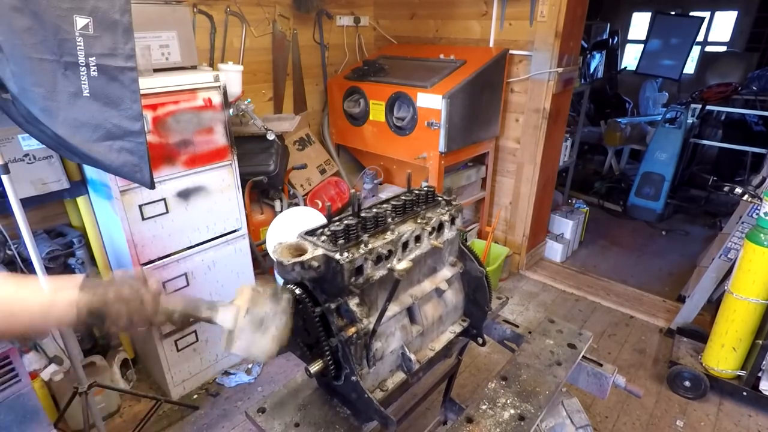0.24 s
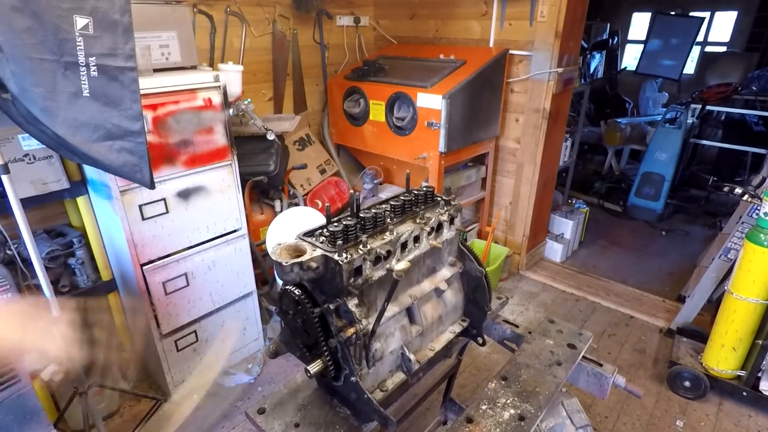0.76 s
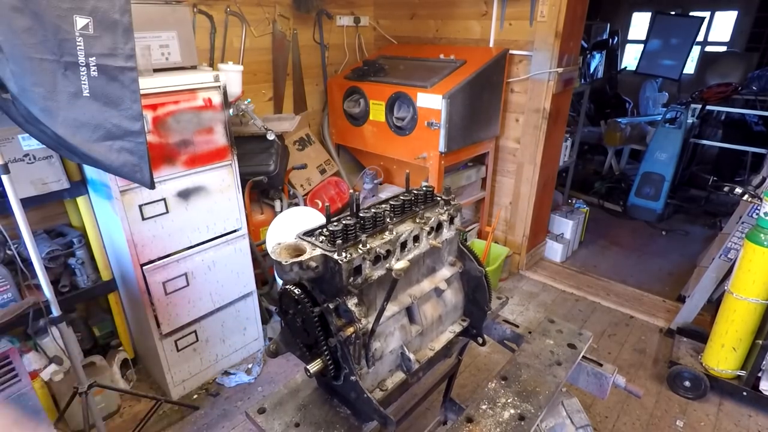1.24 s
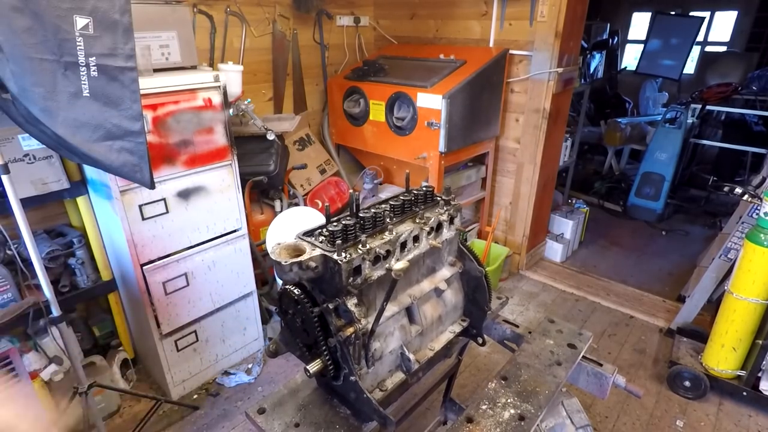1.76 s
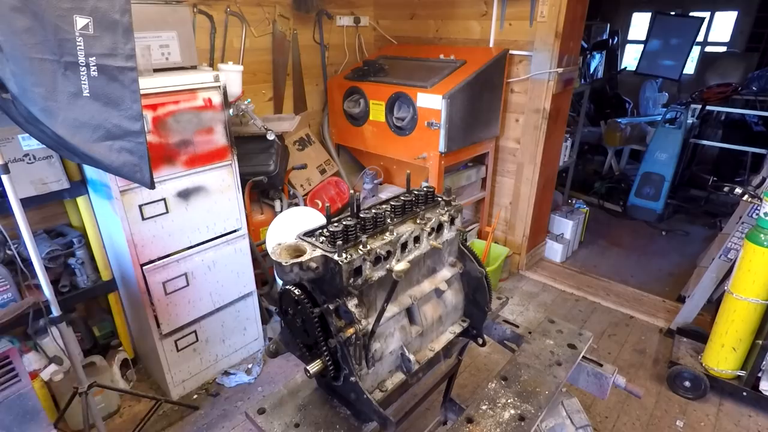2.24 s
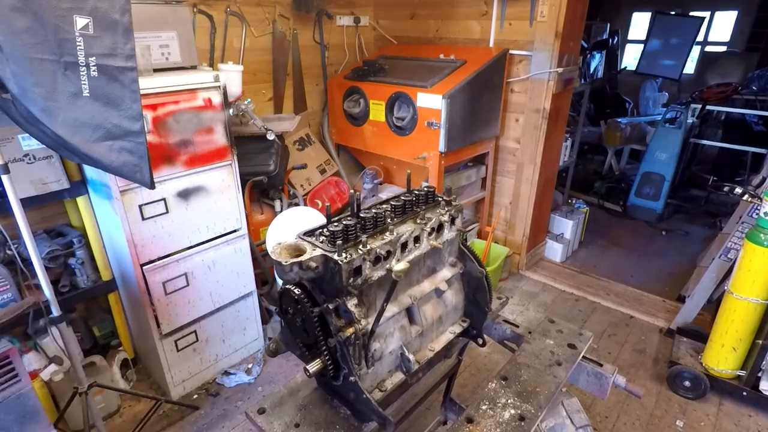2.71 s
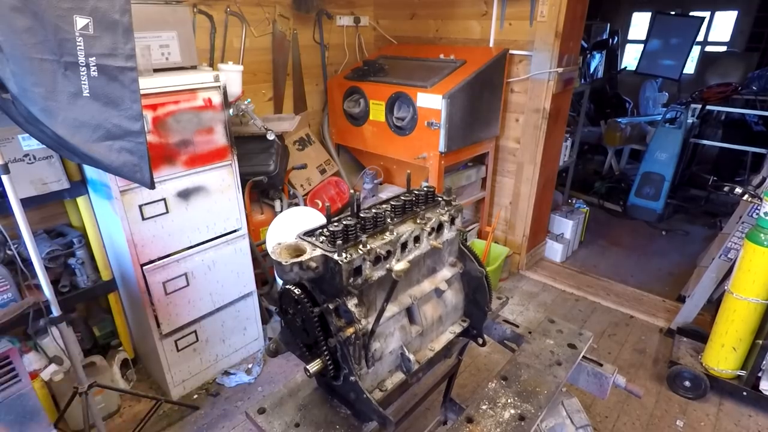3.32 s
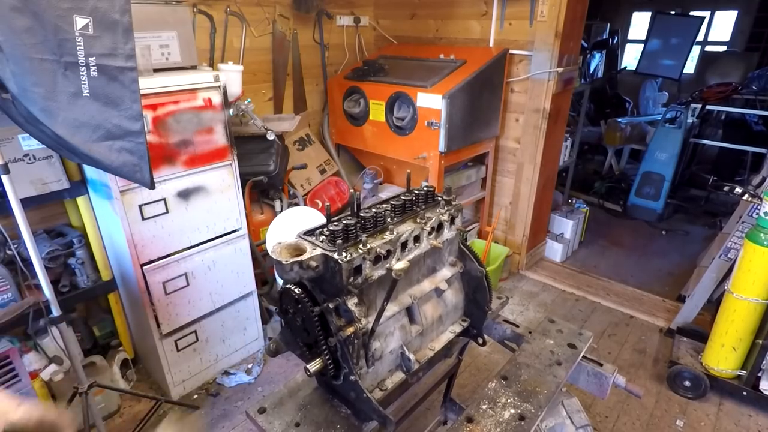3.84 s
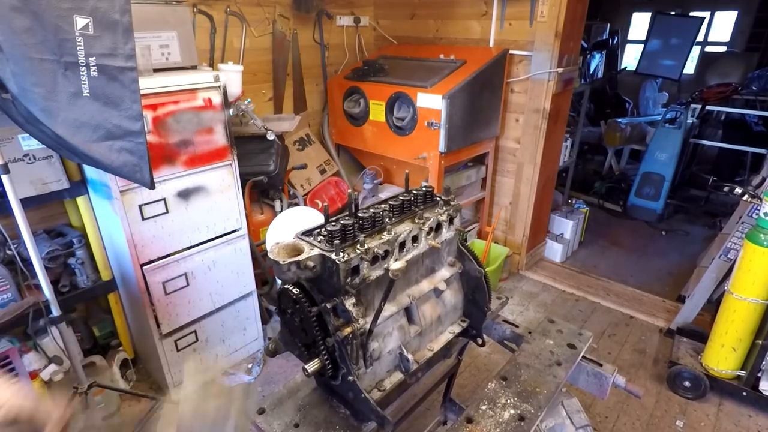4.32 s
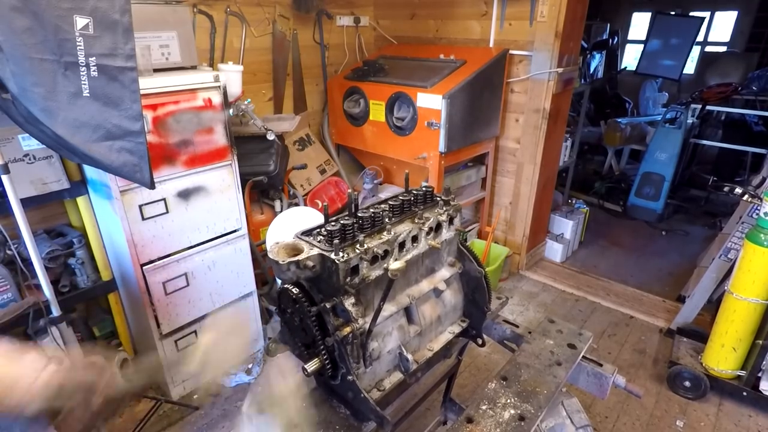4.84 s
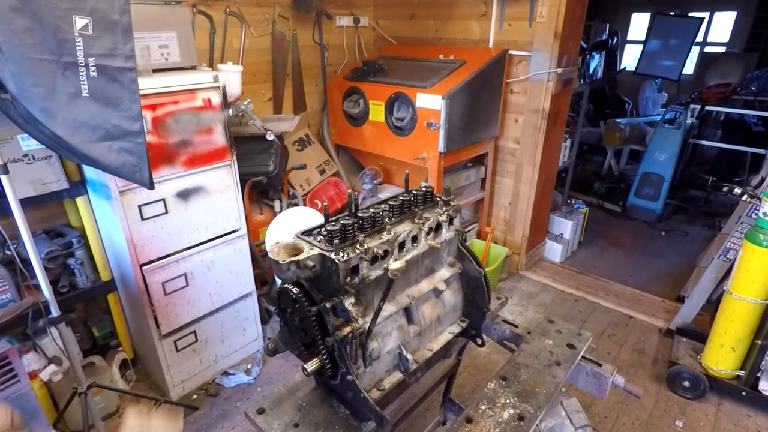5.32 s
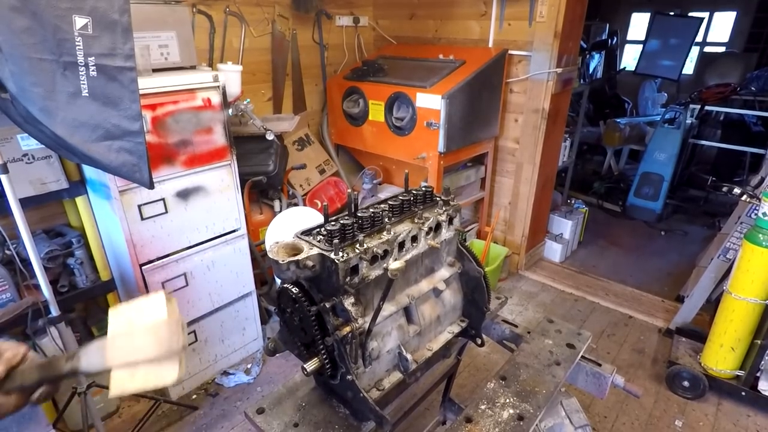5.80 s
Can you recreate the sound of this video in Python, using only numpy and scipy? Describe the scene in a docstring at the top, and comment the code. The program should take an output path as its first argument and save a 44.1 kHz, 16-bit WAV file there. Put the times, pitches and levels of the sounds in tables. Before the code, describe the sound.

A mallet whacks a heavy metal engine casting nine times, about twice a second, then a loose part drops and bounces on wooden boards.

```python
"""Mallet on a stripped engine

A mallet strikes a stripped engine on its stand about twice a second in a small wooden workshop.
After nine blows something comes loose, glances off the engine, lands on the boards and bounces.
Contacts are noise cracks and washes plus decaying sine modes; the loudest peaks clip at the input.
Behind them lie shaped noise, the steady sines of a small fan and a bird's faint gliding whistles.
"""
import sys
import numpy as np
from scipy import signal
from scipy.io import wavfile
from scipy.ndimage import uniform_filter1d

SR = 44100
rng = np.random.default_rng(int(sys.argv[2]) if len(sys.argv) > 2 else 0)


def master_out(mix):
    """Clip the mix to full scale and print it as 16-bit PCM to the path in sys.argv[1]."""
    frames = np.transpose(np.atleast_2d(mix))
    ceiling = np.clip(frames, -1, 1)
    pcm = np.round(ceiling * 32767).astype(np.int16)
    wavfile.write(sys.argv[1], SR, pcm)


N = 267246   # samples, about 6.06 s
AGE = np.arange(int(.7 * SR)) / SR   # time since the start of a single sound [s]


def from_db(db):
    """Decibels to gain."""
    return 10 ** (np.asarray(db) / 20)


def rms_one(x):
    """Scale to unit rms."""
    return x / np.sqrt(np.mean(x ** 2) + 1e-20)


def at_hz(points, hz):
    """Read a (frequency, value) table on a log-frequency axis."""
    table_hz, values = np.array(points).T
    return np.interp(np.log(hz), np.log(table_hz), values)


def fade(t60):
    """Exponential decay that falls 60 dB in t60 seconds."""
    return np.exp(-np.log(1000) * AGE / t60)


def add(out, s, sound):
    """Mix a sound in at time s."""
    start = round(s * SR)
    out[start:start + len(sound)] += sound[:N - start]


BAND_EDGES = np.geomspace(16, 17500, 28)   # Hz


def bands(white):
    """Split two noises into (centre Hz, band) pairs; neighbours get unrelated noise."""
    for k, (low, high) in enumerate(zip(BAND_EDGES, BAND_EDGES[1:])):
        band_pass = signal.butter(2, [low, high], "band", fs=SR, output="sos")
        yield np.sqrt(low * high), signal.sosfilt(band_pass, white[k % 2])


def drift(rate):
    """Slow random wander of spread 1, with rate new targets per second."""
    targets = rng.standard_normal(512)
    return rms_one(np.interp(np.arange(N) / SR * rate, np.arange(512), targets))


# Rumble and hiss of the workshop: (frequency [Hz], relative level [dB])
AIR_SPECTRUM = [(20, 0), (35, -4), (60, -12), (100, -10), (135, -22), (450, -25), (700, -28), (1300, -29),
                (1700, -38), (2600, -43), (6000, -44), (9000, -52), (16000, -57)]
# Background level over time: (time [s], level [dB rms])
AIR_LEVEL = [(0, -57), (2.8, -57.5), (3.4, -58), (4.6, -58), (5.3, -63), (6.06, -54.5)]


def workshop_air(flicker_db):
    """Low rumble and faint hiss: noise bands whose levels flicker independently."""
    air = np.zeros(N)
    for hz, band in bands(rng.standard_normal((2, N))):
        air += from_db(at_hz(AIR_SPECTRUM, hz) + flicker_db * drift(11)) * band
    times, level_db = np.transpose(AIR_LEVEL)
    return from_db(np.interp(np.arange(N) / SR, times, level_db)) * rms_one(air)


# Tones of the fan: (frequency [Hz], level [dB rms])
FAN_TONES = [(152, -72), (463, -82), (770, -85), (917, -71.5), (1457, -79)]


def fan(waver):
    """A small fan's whine: steady sines whose phases wander slightly (waver in radians)."""
    t = np.arange(N) / SR
    whine = np.zeros(N)
    for hz, level_db in FAN_TONES:
        tone = np.sin(2 * np.pi * hz * t + waver * drift(5))
        whine += from_db(level_db) * np.sqrt(2) * tone   # sqrt(2) gives the sine unit rms
    return whine


# Thin bird whistles: (time [s], length [s], start [Hz], end [Hz], peak level [dB])
BIRD_WHISTLES = [(0.04, .07, 6200, 6200, -73), (0.5, .2, 5400, 5120, -70), (2.17, .1, 4950, 5500, -78),
                 (2.68, .19, 6300, 4700, -77)]


def bird(blur_hz):
    """Distant whistles: gliding sines with jittered pitch, blurred by their way indoors."""
    out = np.zeros(N)
    for s, length, start_hz, end_hz, level_db in BIRD_WHISTLES:
        progress = np.clip(AGE / length, 0, 1)
        jitter = rms_one(uniform_filter1d(rng.standard_normal(len(AGE)), size=100))
        pitch = start_hz + (end_hz - start_hz) * progress + blur_hz * jitter
        swell = np.sin(np.pi * progress)
        add(out, s, from_db(level_db) * swell * np.sin(2 * np.pi * np.cumsum(pitch) / SR))
    return out


def stand(rock_hz, level_db, delay_s, width_s):
    """The stand shudders just after each blow: a low note that swells and dies."""
    swell = np.exp(-((AGE - delay_s) / width_s) ** 2)
    shudder = np.sin(2 * np.pi * rock_hz * AGE) * swell
    out = np.zeros(N)
    for s, strength_db, _, _ in MALLET_BLOWS:
        add(out, s, from_db(level_db + strength_db) * shudder)
    return out


# The short crack of the contact itself: (frequency [Hz], relative level [dB])
CONTACT_CRACK = [(60, -5.5), (300, 0), (900, 13.5), (3000, 11.5), (6000, -3.5), (10000, -13), (16000, -14)]
# Decay in the workshop: (frequency [Hz], t60 [s])
ROOM_DECAY = [(50, 0.67), (150, 0.36), (400, 0.29), (1000, 0.28), (2500, 0.27), (5500, 0.25), (9000, 0.064),
              (16000, 0.12)]


def strikes(events, modes, wash, modes_db, alike, crack_db, crack_t60, knee_hz,
            clang_hz, clang_octaves, scatter_db, build_s):
    """Each contact gives a crack, rings the body's modes and fills the room.

    Events are (time [s], strength [dB], hardness [dB per octave], ring [dB], clang [dB]).
    """
    times, strength_db, hardness, ring_db, clang_db = np.array(events).T[:, :, None]

    def force(hz):
        """Harder contact is brighter; the spot that is hit decides how much the body clangs."""
        clang = np.exp(-(np.log2(hz / clang_hz) / clang_octaves) ** 2)
        brightness_db = hardness * np.log2(1 + hz / knee_hz)
        return from_db(strength_db + brightness_db + clang_db * clang)

    # Hits on the same spot take the same paths to the microphone, so they share some fine detail
    shared = rng.standard_normal((2, 1, len(AGE)))
    own = rng.standard_normal((2, len(events), len(AGE)))
    white = np.sqrt(alike) * shared + np.sqrt(1 - alike) * own

    sounds = 0
    for hz, band in bands(white):
        crack = from_db(at_hz(CONTACT_CRACK, hz) + crack_db) * fade(crack_t60)
        tail = from_db(at_hz(wash, hz) + ring_db) * fade(at_hz(ROOM_DECAY, hz))
        sounds = sounds + force(hz) * band * np.hypot(crack, tail)

    phases = rng.uniform(0, 2 * np.pi, len(modes))
    scatter = scatter_db * rng.standard_normal((len(events), len(modes), 1))
    build = 1 - np.exp(-AGE / build_s)   # the vibration takes a moment to spread through the body
    for k, (hz, level_db, t60) in enumerate(modes):
        ringing = build * fade(t60) * np.sin(2 * np.pi * hz * AGE + phases[k])
        mode_gain = from_db(modes_db + level_db + ring_db + scatter[:, k])
        sounds = sounds + force(hz) * mode_gain * ringing

    out = np.zeros(N)
    for s, sound in zip(times[:, 0], sounds):
        add(out, s, sound)
    return out


# The loose part's light tick on the engine, passed on by the stand to the boards as a soft thump
GLANCE_S, GLANCE_DB, GLANCE_THUMP_DB = 4.997, -16, -26
GLANCE_HARDNESS, GLANCE_RING_DB, GLANCE_CLANG_DB = 0.73, -4.5, -10
OTHER_END_S = .0205   # the part's other end comes down this much later
# A weaker landing is duller: hardness at 0 dB strength [dB per octave], its change per dB of strength
LANDING_HARDNESS, HARDNESS_PER_DB = -0.93, 0.3152
# The part lands and bounces: (time [s], first end level [dB], other end level [dB], clang [dB])
PART_LANDINGS = [(5.4012, 0, -18, 3), (5.651, -19, -10, 12.5), (5.828, -22, -23, -4)]
# Ring of the boards and what lands on them: (frequency [Hz], relative level [dB], t60 [s])
BOARD_RING = [(72, -21, .3), (110, -20, .3), (155, -11.5, .38), (172, -16, .3), (205, -11, .4),
              (262, -20, .33), (305, -13, .35), (345, -14, .3), (390, -10.5, .25), (430, -8.5, .25),
              (482, -10.5, .25), (527, -9, .28), (595, -13, .28), (772, -13, .27), (845, -14, .24),
              (928, -13, .2), (992, -15, .22)]
# Crowd of weaker board modes and room reflections at contact: (frequency [Hz], relative level [dB])
BOARD_CROWD = [(50, -9.5), (130, 4), (350, 15), (850, 7.5), (1400, -3), (2300, -6.5), (3500, -13),
               (5600, -28), (9000, -40), (16000, -44)]


def part_on_boards():
    """The glance's thump, then two touches per landing, ring the low, wooden board modes."""
    touches = [(GLANCE_S, GLANCE_THUMP_DB, 0)]
    for s, first_db, other_db, clang_db in PART_LANDINGS:
        touches += [(s, first_db, clang_db), (s + OTHER_END_S, other_db, clang_db)]
    contacts = [(s, db, LANDING_HARDNESS + HARDNESS_PER_DB * db, 0, clang_db)
                for s, db, clang_db in touches]
    return strikes(contacts, BOARD_RING, BOARD_CROWD, modes_db=-1.5, alike=0.24,
                   crack_db=-21, crack_t60=0.021, knee_hz=1105,
                   clang_hz=1405, clang_octaves=0.87, scatter_db=3.5, build_s=0.00067)


# A softer blow rings less against its crack: dB of ring per unit of hardness
RING_PER_HARDNESS = .55
# Fallen back on the casting, the mallet stays pressed against the metal, which damps the ring
REBOUND_HARDNESS, REBOUND_RING_DB = -2.2, -11.5
# Mallet on the engine: (time [s], strength [dB], hardness [dB per octave], clang [dB])
MALLET_BLOWS = [(0.2793, 1, 0.5, 2.5), (0.84, -1, 2, 1), (1.3944, 1, -1.5, 2.5), (1.9001, 3.5, -3.5, 0.5),
                (2.4291, 1.5, -1, 1), (2.953, 1, -3, -5.5), (3.6186, 0.5, 0, 2), (4.1724, 0.5, 3, -1),
                (4.7320, -1.5, 2, -1.5)]
# The mallet now and then falls back on the casting: (time [s], strength [dB])
MALLET_REBOUNDS = [(0.886, -3.5), (2.481, -15.5)]
# Ring of the engine casting: (frequency [Hz], relative level [dB], t60 [s])
ENGINE_RING = [(156, -33, .45), (265, -19, .22), (349, -21, .3), (430, -20, .2), (462, -22, .22),
               (492, -22, .25), (522, -28, .3), (590, -26, .28), (624, -19, .22), (673, -16.5, .27),
               (707, -19, .22), (738, -24, .25), (777, -19, .17), (812, -22, .27), (857, -20, .3),
               (894, -16, .22), (958, -23, .22), (993, -15.5, .24), (1015, -23, .28), (1052, -17, .29),
               (1092, -20, .24), (1150, -16, .27), (1168, -18, .27), (1220, -17, .22), (1304, -24, .24),
               (1405, -21, .17), (1531, -22, .2), (1579, -25, .2), (1800, -27, .17), (2190, -24, .22)]
# Crowd of weaker engine modes and room reflections at contact: (frequency [Hz], relative level [dB])
ENGINE_CROWD = [(50, -11.5), (150, -10), (300, 1.5), (600, 2), (1100, 4.5), (1500, -0.5), (2300, -1),
                (3400, -6.5), (5500, -14), (7200, -32.5), (9500, -28), (16000, -33)]


def contacts_on_engine():
    """Blows, damped rebounds and the part's glancing tick ring the dense modes of the casting."""
    contacts = [(GLANCE_S, GLANCE_DB, GLANCE_HARDNESS, GLANCE_RING_DB, GLANCE_CLANG_DB)]
    for s, strength_db, hardness, clang_db in MALLET_BLOWS:
        ring_db = RING_PER_HARDNESS * hardness
        # taking the ring share off the strength leaves the shift to the crack alone
        contacts.append((s, strength_db - ring_db, hardness, ring_db, clang_db))
    for s, strength_db in MALLET_REBOUNDS:
        contacts.append((s, strength_db, REBOUND_HARDNESS, REBOUND_RING_DB, 0))
    return strikes(contacts, ENGINE_RING, ENGINE_CROWD, modes_db=-0.08, alike=.75,
                   crack_db=-4.0, crack_t60=0.012, knee_hz=1800,
                   clang_hz=1060, clang_octaves=.42, scatter_db=2.5, build_s=0.002)


def scene():
    """The quiet workshop, the falling part and the blows, in mono."""
    background = workshop_air(flicker_db=2.0) + fan(waver=0.2) + bird(blur_hz=80)
    shudder = stand(rock_hz=91.4, level_db=-33, delay_s=.08, width_s=0.029)
    mix = background + shudder + part_on_boards() + contacts_on_engine()
    return mix[None]


OVERLOAD = .57   # clipping level, as a fraction of full scale
CUTOFF_HZ = 15800


def record(dry):
    """The input stage clips flat, then the top is cut."""
    clipped = np.clip(dry, -OVERLOAD, OVERLOAD)
    low_pass = signal.firwin(101, CUTOFF_HZ, window=("kaiser", 8), fs=SR)
    return signal.fftconvolve(clipped, low_pass[None], mode="same")


dry = scene()
out = record(dry)
master_out(out)
```